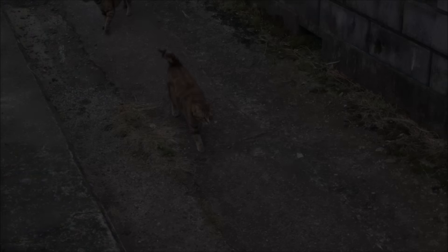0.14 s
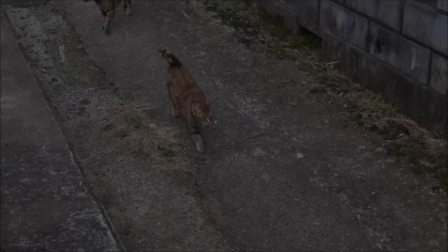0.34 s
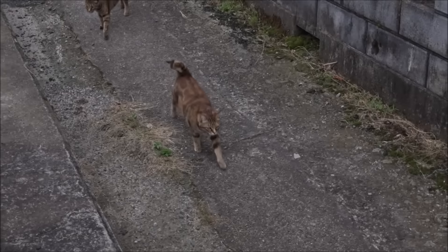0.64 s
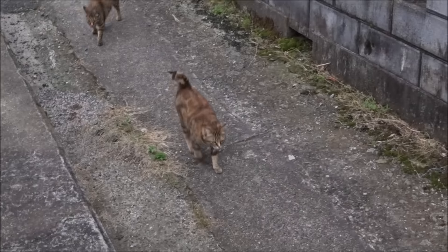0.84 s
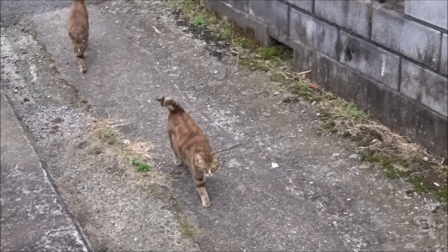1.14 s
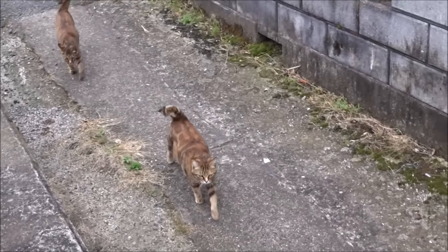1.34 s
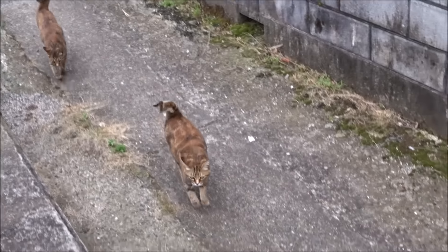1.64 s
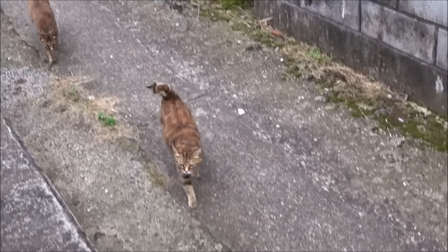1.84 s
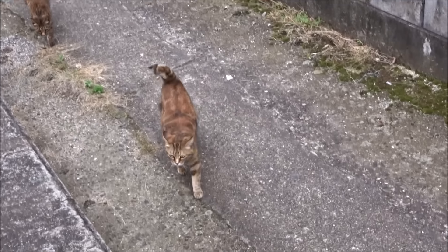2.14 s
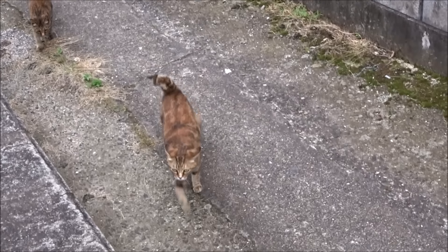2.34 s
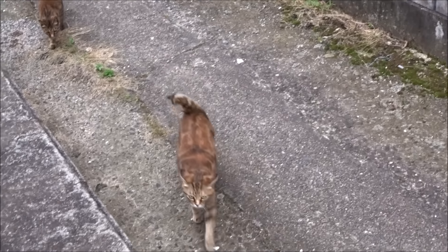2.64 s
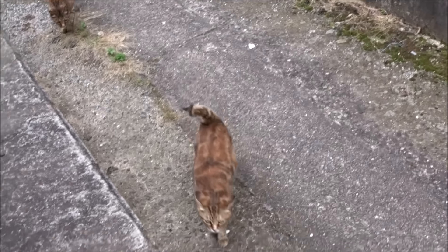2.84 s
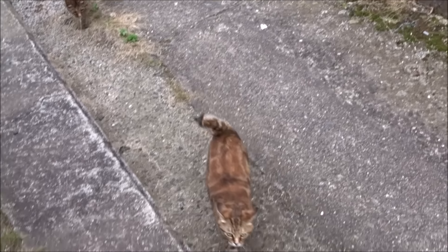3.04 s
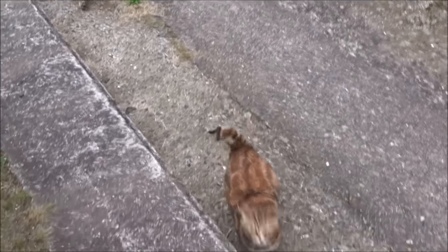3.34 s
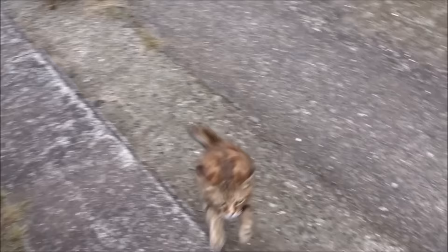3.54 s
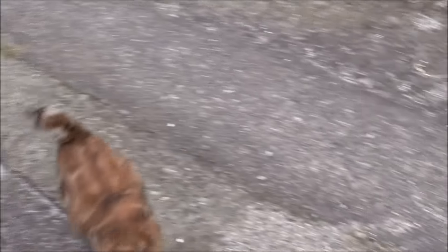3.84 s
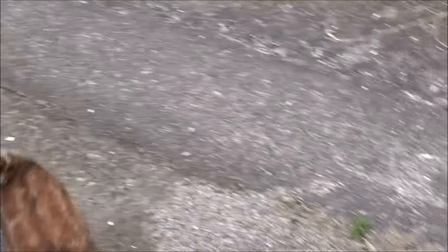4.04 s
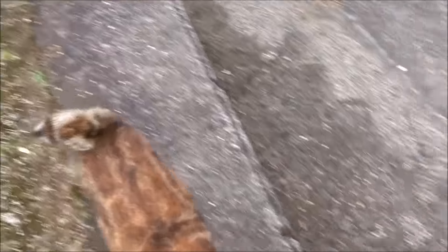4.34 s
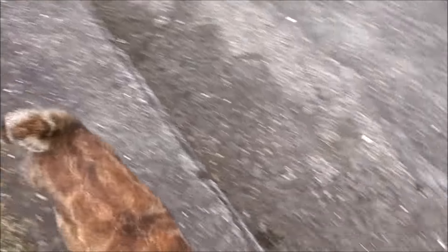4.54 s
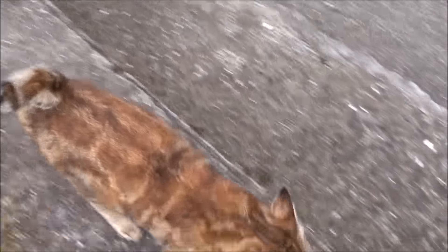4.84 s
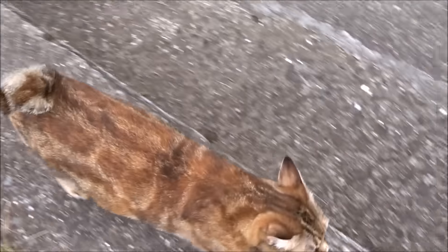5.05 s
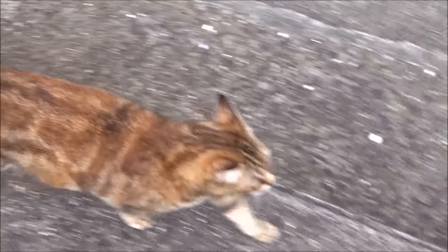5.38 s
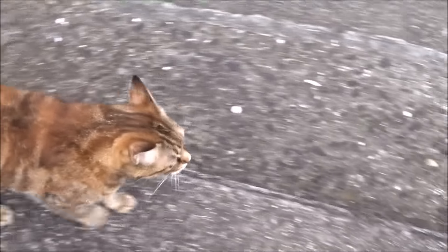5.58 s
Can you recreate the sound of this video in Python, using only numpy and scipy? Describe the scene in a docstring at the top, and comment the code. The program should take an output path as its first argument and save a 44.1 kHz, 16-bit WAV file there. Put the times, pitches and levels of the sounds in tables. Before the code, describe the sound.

Faint, steady open-air hiss with a few distant bird chirps, soft knocks and ticks on the microphone, and light rustling close by.

```python
"""A quiet concrete yard, heard through the stereo microphone of a hand-held camera. At the microphone,
the hand knocks and ticks on the casing; close by, cloth or fur rubs and something squeaks once.
Far off, a few bird notes echo from the walls over an even open-air hiss with a faint, fuzzy hum in it.
The sound blips on, fades up from silence, and drops out once for a moment."""
import sys
import numpy as np
from scipy import signal
from scipy.io import wavfile
from scipy.ndimage import uniform_filter1d

SR = 44100
rng = np.random.default_rng(int(sys.argv[2]) if len(sys.argv) > 2 else 0)


def transcribe(u):
    """Save the signal u as a 16-bit wav file named by the first command-line argument.

    u: samples, shape (n,) or (channels, n), limited to [-1, 1]; the rate is SR.
    q: integer samples, one column per channel.
    """
    v = np.clip(np.atleast_2d(u).T, -1, 1)
    q = np.round(v * 32767).astype(np.int16)
    wavfile.write(sys.argv[1], SR, q)


N = 251987


def gain_of(db):
    """Decibels to gain."""
    return 10 ** (np.asarray(db) / 20)


def unit_rms(x):
    """Scales to rms 1."""
    return x / np.sqrt(np.mean(x ** 2) + 1e-20)


def curve_at(points, hz):
    """Reads a spectrum table on a log-frequency axis."""
    f, value = np.transpose(points)
    return np.interp(np.log(hz + 1), np.log(f + 1), value)


def place(mix, start_s, sound, pan_db):
    """Adds a sound to both channels; pan_db is left minus right."""
    part = mix[:, round(start_s * SR):][:, :len(sound)]
    part += gain_of([[pan_db / 2], [-pan_db / 2]]) * sound[:part.shape[1]]


def butter_filter(x, order, hz, kind):
    """A Butterworth filter."""
    return signal.sosfilt(signal.butter(order, hz, kind, fs=SR, output="sos"), x)


def resonate(x, hz, width_hz):
    """A resonance that can glide: shifts hz down to zero, smooths, and shifts back."""
    turn = np.exp(2j * np.pi * np.cumsum(hz * np.ones(len(x))) / SR)
    pole = np.exp(-np.pi * width_hz / SR)
    return 2 * (turn * signal.lfilter([1 - pole], [1, -pole], x / turn)).real


def wander(rate_hz):
    """A random drift of rms 1."""
    return unit_rms(butter_filter(rng.standard_normal(N), 2, rate_hz, "low"))


def casing_knocks(ring_s=.013, halving_db=14):
    """At the microphone: a soft push of the hand rings the casing for a few cycles."""
    # dull knocks through the casing: t/s, level/dB, f/Hz
    pushes = [(1.074, -43, 520), (1.713, -38.5, 265), (1.73, -45, 600), (1.9015, -39, 600),
              (1.907, -38, 400), (2.076, -41, 505), (2.1302, -24, 530), (2.1333, -34, 300),
              (2.1365, -26.5, 520), (2.525, -44, 350), (2.7575, -39, 420), (2.7645, -42, 380),
              (3.112, -42, 440), (3.695, -39, 700), (3.7155, -33, 1400), (3.717, -35, 1400),
              (3.7255, -31, 1300), (3.7275, -29, 1050), (3.7297, -30, 1000), (3.7395, -34, 600),
              (4.1562, -29, 1100), (4.147, -35, 1000), (4.163, -33, 700), (5.3285, -35, 1200),
              (5.3298, -30, 1100), (5.336, -36, 1400), (5.364, -30, 1200), (5.3705, -35, 1400)]
    out, t = np.zeros((2, N)), np.arange(3000) / SR
    for start, db, hz in pushes:
        t60 = ring_s * 2 ** (-(db + 36) / halving_db) * (400 / hz) ** .7  # harder or higher dies sooner
        envelope = (1 - np.exp(-t / .0006)) ** 2 * gain_of(-60 * t / t60)
        ring = -envelope / envelope.max() * np.sin(2 * np.pi * hz * t)
        place(out, start, gain_of(db) * ring, pan_db=-1)
    out = butter_filter(out, 2, 170, "high")  # the small casing carries no deep bass
    return out + 0.43 * np.roll(out, 25) * [[1], [-1]]  # the channels get it slightly apart


def ticks_and_squeak_pulses():
    """Close up: casing ticks and the squeak's pulses, each a filtered click with a tiny scatter."""
    # sharp ticks on the casing, and four narrow pulses of the squeak at 2.71-2.75 s:
    # t/s, level/dB, lowest f/Hz, highest f/Hz
    clicks = [(.7855, -40, 4000, 12000), (1.9055, -38, 1000, 4000), (2.134, -32, 6600, 8000),
              (2.1341, -22.5, 150, 1900), (2.6712, -35, 1200, 3500), (2.7105, -30, 2000, 2700),
              (2.727, -37, 2100, 2900), (2.7395, -35, 1900, 2700), (2.7475, -35, 2300, 3100),
              (2.7737, -28, 2300, 4200), (2.7738, -42, 9000, 14500), (2.8036, -26, 600, 5000),
              (2.8037, -32, 5000, 16500), (2.804, -35, 11100, 12000), (3.0143, -29.5, 2500, 12000),
              (3.118, -30, 1500, 5000), (3.8108, -31, 1500, 6000), (3.9547, -31, 11500, 15000),
              (3.9749, -29, 700, 2500), (3.975, -32, 5800, 8200), (3.9751, -35, 10500, 15000),
              (3.98, -39, 10000, 13000), (4.1024, -29, 2200, 5000), (4.1025, -33, 7000, 15000),
              (4.1572, -29, 1500, 5000), (4.1896, -34, 7500, 11500), (4.5345, -32, 700, 3500),
              (4.63, -30, 1200, 3000), (5.377, -39, 5100, 5800), (5.379, -39, 5100, 5700),
              (5.384, -41, 4500, 5200), (5.395, -33, 1200, 2100), (5.5202, -31, 1200, 3000),
              (5.5204, -34, 7500, 15000)]
    out, t = np.zeros((2, N)), np.arange(300) / SR
    scatter = rng.standard_normal((len(clicks), len(t))) * .25 * np.exp(-t / .0004)
    bursts = scatter - np.exp(-t / .00004)
    for (start, db, low_hz, high_hz), burst in zip(clicks, bursts):
        click = butter_filter(burst, 2, [low_hz, high_hz], "band")
        place(out, start, gain_of(db) * click / abs(click).max(), pan_db=-1)
    dull = uniform_filter1d(out, size=4)  # the duller part reaches the channels slightly apart
    return out + 1.1 * np.roll(dull, 6) * [[1], [-1]]


def rustle():
    """Close by: cloth or fur rubs, dense grains of friction in a broad moving resonance with a hissy top."""
    # strokes, each a smooth swell: middle t/s, half length/s, level/dB, centre f/Hz
    strokes = [(.73, 0.12, -48.5, 1950), (3.718, 0.05, -43, 1300), (3.8, 0.14, -48.5, 1040),
               (3.97, 0.055, -48, 1440), (4.144, 0.083, -50.5, 830), (4.335, .08, -49.5, 1050),
               (4.503, 0.27, -46.5, 1000), (4.61, .06, -46, 2050), (4.9, .2, -50, 960),
               (5.135, 0.094, -48, 1090), (5.315, 0.04, -47.5, 1500), (5.385, .04, -49, 1600),
               (5.62, .1, -58, 2000)]
    middle_s, half_s, db, hz = np.transpose(strokes)[:, :, None]
    t = np.arange(N) / SR
    frame_s = t[::64]
    power = gain_of(db) ** 2 * (np.exp(-2 * ((frame_s - middle_s) / half_s) ** 2) + 1e-6)
    swell = np.interp(t, frame_s, np.sqrt(power.sum(0)))
    centre_hz = np.interp(t, frame_s, (power * hz).sum(0) / power.sum(0))  # follows the loudest stroke
    grains = rng.standard_normal(N) * gain_of(2.0 * wander(150) + .8 * wander(25))
    body = unit_rms(resonate(resonate(grains, centre_hz, 1360), centre_hz, 1360))
    top = unit_rms(resonate(resonate(grains, 5100, 2800), 5100, 2800))
    rub = butter_filter(body + gain_of(-17) * top, 3, 480, "high")
    return swell * rub * gain_of([[-.6], [.6]])


def squeak():
    """Near the centre: one rough little squeak, noise in a narrow resonance that steps up in pitch."""
    # course of the squeak: t/s, f/Hz, level/dB
    course = [(2.69, 1780, -58), (2.7, 1780, -47.5), (2.713, 1780, -47.5), (2.717, 2380, -50),
              (2.74, 2320, -46), (2.748, 2550, -46.5), (2.754, 2600, -60)]
    times, hz, db = np.transpose(course)
    t = np.arange(times[0], times[-1], 1 / SR)
    rough = unit_rms(resonate(rng.standard_normal(len(t)), np.interp(t, times, hz), width_hz=130))
    out = np.zeros((2, N))
    place(out, times[0], gain_of(np.interp(t, times, db)) * rough, pan_db=-.5)
    return out


def birds(echo_db=-15):
    """Far off: slightly fluttering whistles with soft ends, blurred by two echoes off the yard's walls."""
    # notes on a pitch arc: t/s, length/s, start f/Hz, middle f/Hz, end f/Hz, level/dB
    notes = [(1.124, .024, 6200, 5450, 3950, -47), (1.204, .044, 5450, 5650, 5650, -51),
             (1.221, .071, 3300, 4740, 4000, -50), (1.277, .052, 5800, 4800, 3650, -47.5),
             (2.422, .013, 4900, 4750, 4500, -50), (3.242, .018, 3950, 3950, 4050, -50),
             (3.265, .014, 4550, 4420, 4500, -50), (3.279, .018, 4000, 3880, 4150, -47.5),
             (3.298, .013, 3750, 3950, 4000, -46.5), (3.308, .014, 3950, 3850, 4100, -46.5)]
    out, flutter = np.zeros((2, N)), wander(320)
    for start, length, start_hz, middle_hz, end_hz, db in notes:
        u = np.linspace(-1, 1, round(length * SR))
        hz = middle_hz + (end_hz - start_hz) / 2 * u + ((start_hz + end_hz) / 2 - middle_hz) * u ** 2
        shake = flutter[round(start * SR):][:len(u)]
        tone = np.sqrt(2) * np.sin(2 * np.pi * np.cumsum(hz * (1 + .011 * shake)) / SR)
        arch_db = -4.5 * (u - .1) ** 2  # loudest just past the middle
        tone *= gain_of(db + arch_db + 1.8 * shake) * signal.windows.tukey(len(u), .2)
        place(out, start, tone, pan_db=-.5)
        place(out, start + .007, gain_of(echo_db) * tone, pan_db=3)
        place(out, start + .024, gain_of(echo_db) * tone, pan_db=-3)
    return out


def hum(edge_s=.026):
    """In the background, to the left: narrow wavering noise, held at first, later in short glides."""
    # fuzzy bands in the hiss: t/s, length/s, start f/Hz, end f/Hz, width/Hz, level/dB
    bands = [(.4, 1.1, 1190, 1180, 60, -53.5), (1.47, 3.08, 1180, 1160, 65, -56),
             (4.33, .1, 850, 830, 90, -53), (4.68, .08, 830, 720, 90, -52),
             (4.87, .17, 980, 1000, 100, -51.5), (5.02, .06, 820, 690, 60, -51)]
    out, waver = np.zeros((2, N)), gain_of(0.85 * wander(11))
    for start, length, start_hz, end_hz, width_hz, db in bands:
        t = np.arange(0, length, 1 / SR)
        hz = start_hz + (end_hz - start_hz) * t / length
        both, left, right = (unit_rms(resonate(rng.standard_normal(len(t)), hz, width_hz))
                             for _ in range(3))
        envelope = gain_of(db) * np.clip(np.minimum(t, length - t) / edge_s, 0, 1)
        pair = np.array([1.37 * both + 0.65 * left, 0.61 * both + 0.6 * right])
        out[:, round(start * SR):][:, :len(t)] += envelope * pair
    return out * waver


def air_hiss(patch_db=.96, flicker_db=.33):
    """All round: the open air, random mid and side spectra with drifting patches and a shared flicker."""
    # spectrum of the open air: f/Hz, level/dB
    spectrum = [(20, -50), (50, -20), (110, -8), (240, -10.5), (310, -5), (520, -3), (1000, -1.5),
                (1400, -3.5), (2100, -2.5), (3500, -6), (6000, -8.5), (8200, -16), (12000, -22.5),
                (15700, -32)]
    # stereo width: f/Hz, side minus mid/dB
    width = [(60, -11), (110, -16), (170, -12), (270, -8), (450, -4.5), (740, 2), (1050, 2.5), (1300, 0.5),
             (2010, -5), (3330, -9), (5500, -12), (9000, -5.5), (9700, -4.5), (10800, -25), (15000, -35)]
    # stereo balance: f/Hz, left minus right/dB
    balance = [(300, 0), (900, -1.7), (2400, -0.5), (5000, 1), (8000, -2), (9600, -1), (10500, -0.5)]
    # drift of the hiss: t/s, level/dB, treble tilt/(dB per octave), width change/dB, bass lift/dB
    drift = [(.47, -46.5, 2.5, 0, -4), (.82, -49.3, 2.5, 0, -4), (1.15, -47.5, 2.5, 0, -2),
             (2, -47, 2.5, -1.5, -0.5), (3.3, -47.5, 2.5, -2, -4.5), (4.25, -47, 3, -1.5, 2.5),
             (4.29, -46.5, 1, -2.5, 1.5), (5.71, -47, 3, -5, 0)]
    frames, hz = N // 256 + 5, np.fft.rfftfreq(1024, 1 / SR)
    mid_re, mid_im, side_re, side_im, patches = rng.standard_normal((frames, len(hz), 5)).T
    patches = unit_rms(uniform_filter1d(uniform_filter1d(patches, size=14, axis=0), size=12, axis=1))
    flicker = unit_rms(uniform_filter1d(rng.standard_normal(frames), size=8))
    times, *columns = np.transpose(drift)
    frame_s = np.arange(frames) * 256 / SR
    level_db, tilt_db, wide_db, bass_db = (np.interp(frame_s, times, column) for column in columns)
    treble_octaves = np.log2(np.maximum(hz, 4000) / 4000)[:, None]
    top_edge_db = -np.clip(hz - 15750, 0, 200)[:, None] * .3
    bass_shelf = 1 / (1 + (hz[:, None] / 300) ** 4)
    colour_db = curve_at(spectrum, hz)[:, None] + top_edge_db
    colour_db = colour_db + tilt_db * treble_octaves + bass_db * bass_shelf
    field = gain_of(colour_db + level_db + patch_db * patches + flicker_db * flicker)
    mid = field * (mid_re + 1j * mid_im)
    side = field * gain_of(curve_at(width, hz)[:, None] + wide_db) * (side_re + 1j * side_im)
    lean = gain_of(curve_at(balance, hz)[:, None] / 2)
    pair = np.array([(mid + side) * lean, (mid - side) / lean])
    level_band = hz[(hz > 2500) & (hz < 9000)]
    band_gain = np.sqrt(np.sum(gain_of(curve_at(spectrum, level_band)) ** 2))
    return signal.istft(pair, nperseg=1024, noverlap=768)[1][:, :N] / band_gain * gain_of(1.0)


def fader(blip_s=(.411, .4205), rise_start_s=.426, rise_s=.28, dropout_s=(4.249, 4.2815), sink_s=.014):
    """Silence, a blip, a rise that levels off, and one dropout that sinks until the sound snaps back."""
    t = np.arange(N) / SR
    gain = 1 - np.exp(-np.maximum(t - rise_start_s, 0) / rise_s)
    gain += gain_of(-16.5) * ((t > blip_s[0]) & (t < blip_s[1]))
    dropped = (t > dropout_s[0]) & (t < dropout_s[1])
    sinking = gain_of(-14) * (1 - (t[dropped] - dropout_s[0]) / sink_s)
    gain[dropped] *= np.maximum(sinking, gain_of(-55))
    return uniform_filter1d(gain, size=60)


def scene():
    """The yard at the microphone, with the top taken off the hum, rustle and squeak."""
    air = air_hiss()
    softened = butter_filter(hum() + rustle() + squeak(), 6, 11000, "low")
    return air + softened + birds() + casing_knocks() + ticks_and_squeak_pulses()


def record(dry, low_cut_hz=100, top_hz=16350):
    """The microphone's bass cut, the fade and dropout, then the band limit."""
    thin = butter_filter(dry, 2, low_cut_hz, "high")
    band_limit = signal.firwin(511, top_hz, window=("kaiser", 9), fs=SR)
    return signal.oaconvolve(thin * fader(), band_limit[None], "same")


dry = scene()
out = record(dry)
transcribe(out)
```